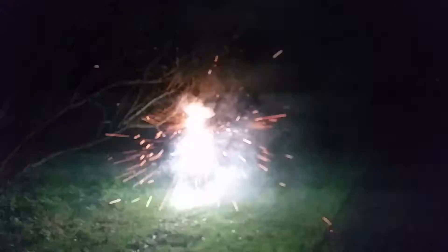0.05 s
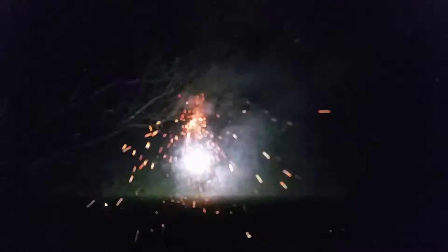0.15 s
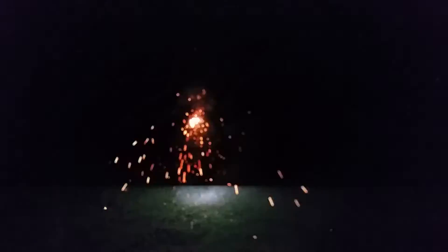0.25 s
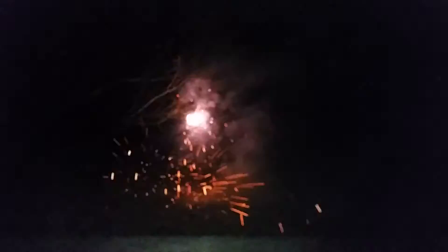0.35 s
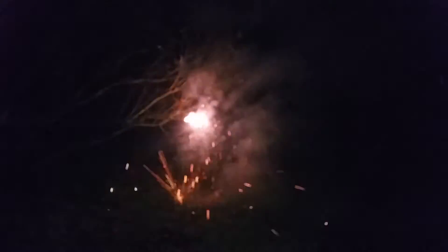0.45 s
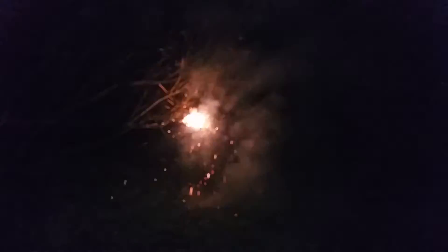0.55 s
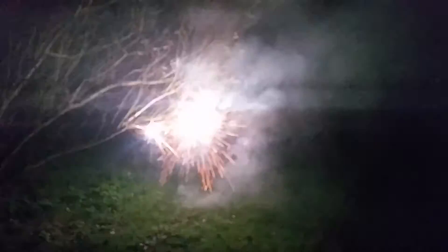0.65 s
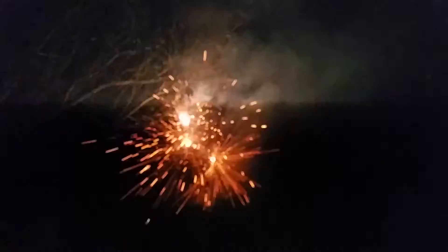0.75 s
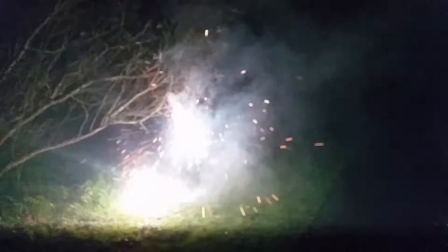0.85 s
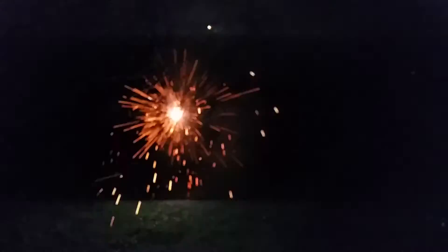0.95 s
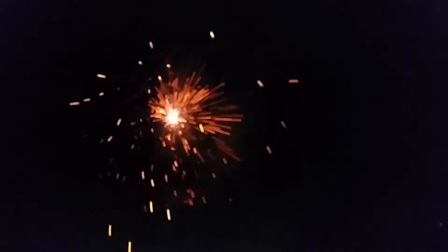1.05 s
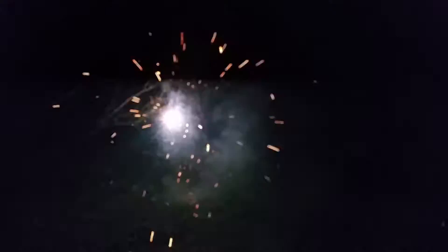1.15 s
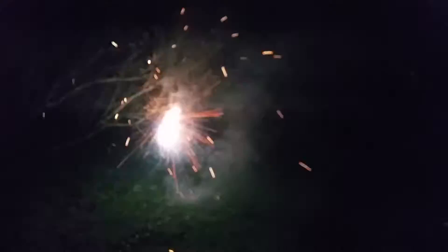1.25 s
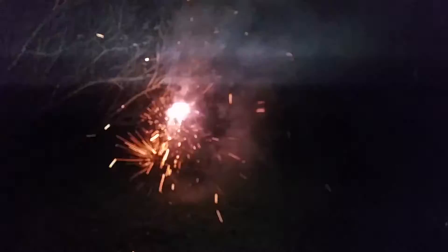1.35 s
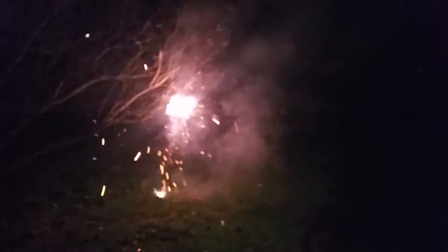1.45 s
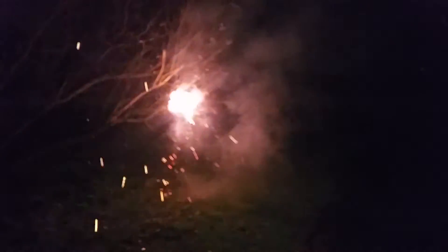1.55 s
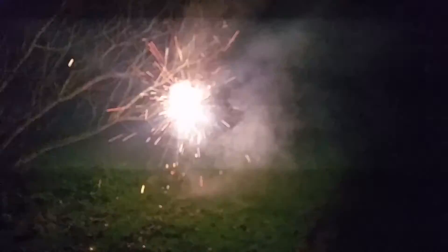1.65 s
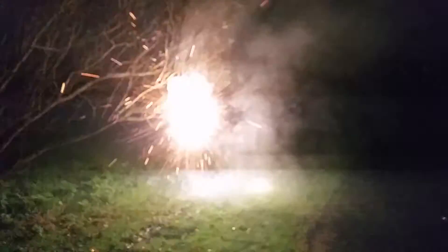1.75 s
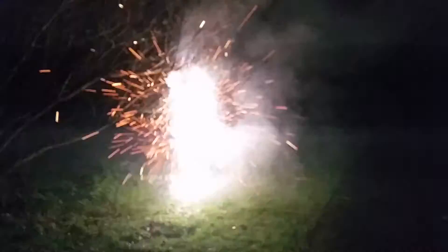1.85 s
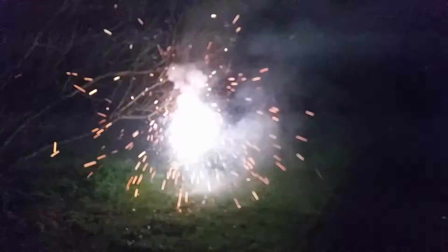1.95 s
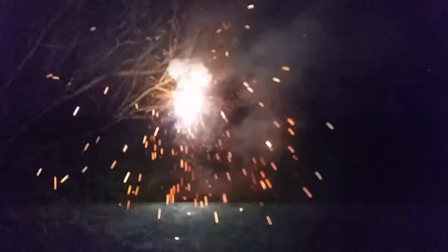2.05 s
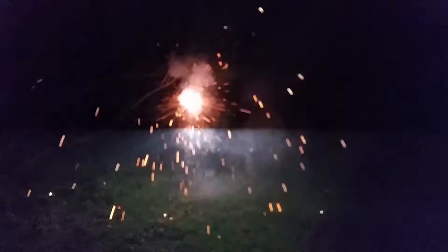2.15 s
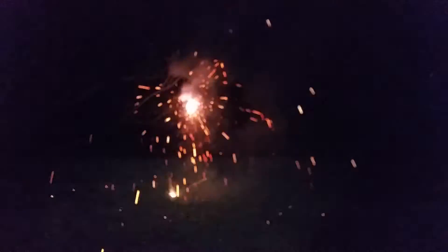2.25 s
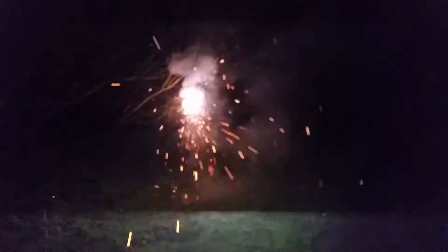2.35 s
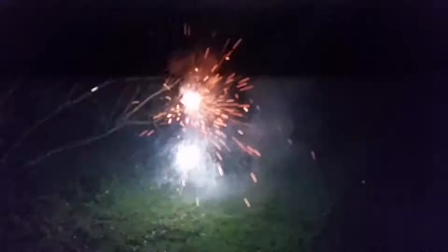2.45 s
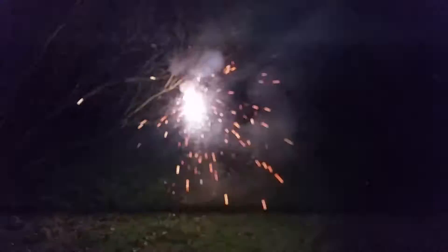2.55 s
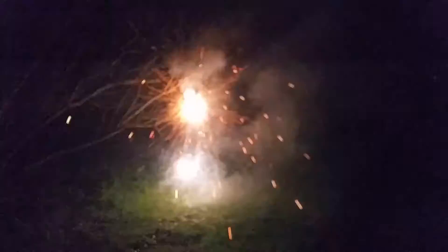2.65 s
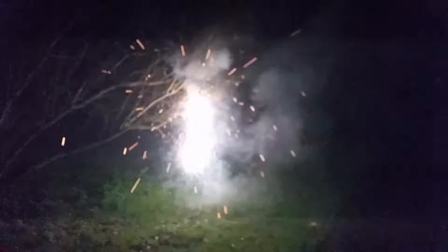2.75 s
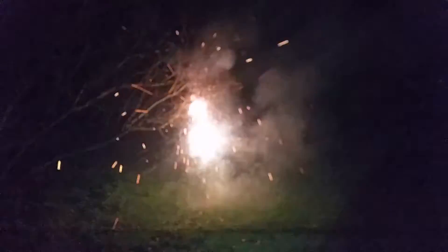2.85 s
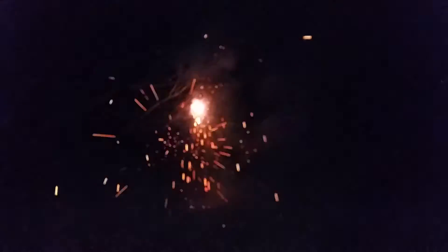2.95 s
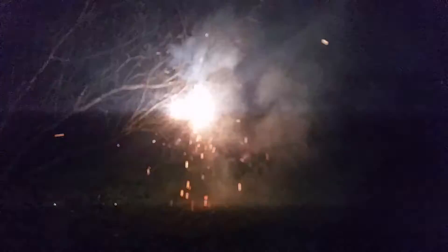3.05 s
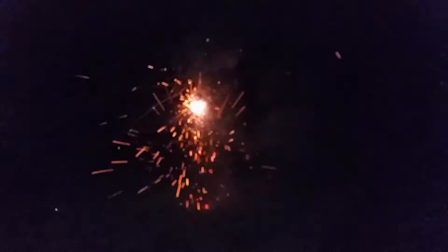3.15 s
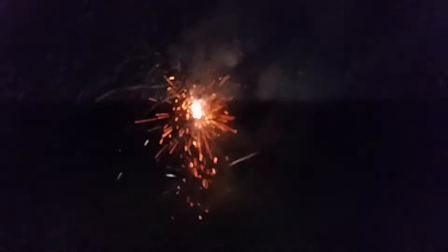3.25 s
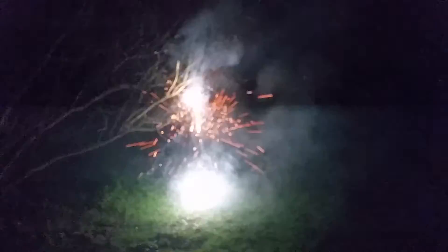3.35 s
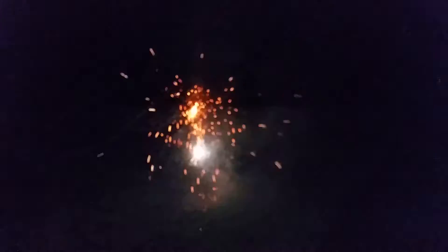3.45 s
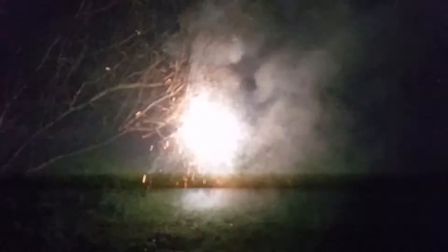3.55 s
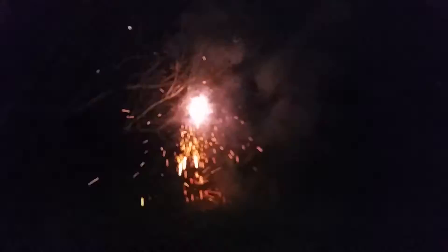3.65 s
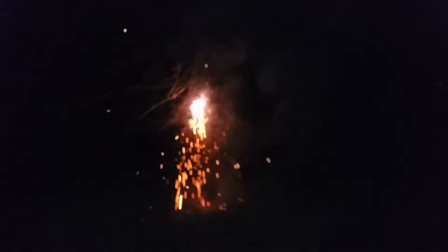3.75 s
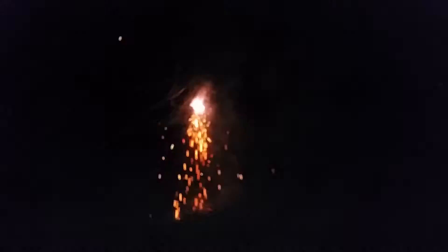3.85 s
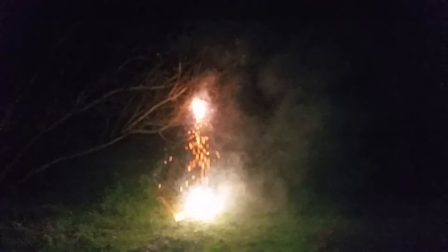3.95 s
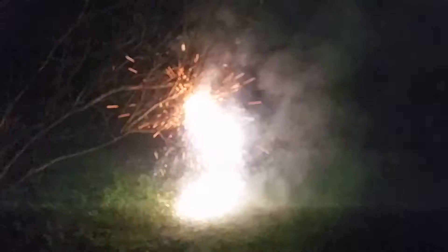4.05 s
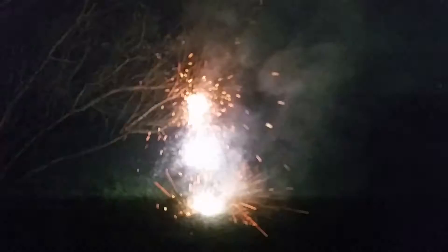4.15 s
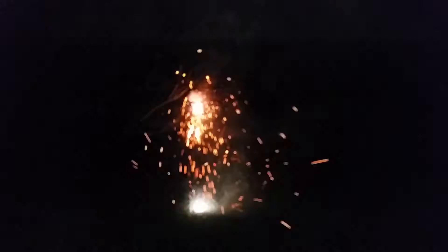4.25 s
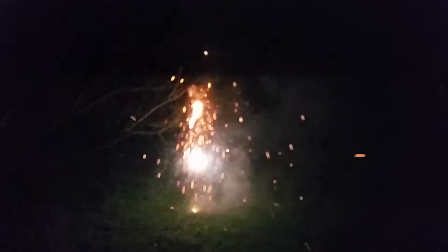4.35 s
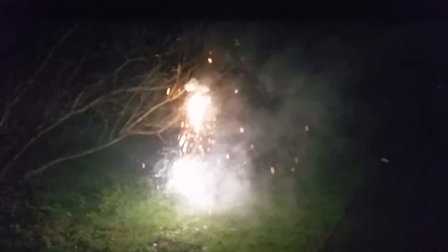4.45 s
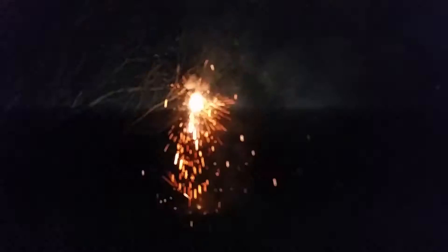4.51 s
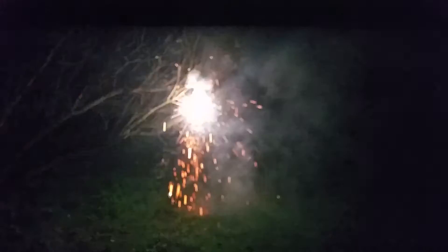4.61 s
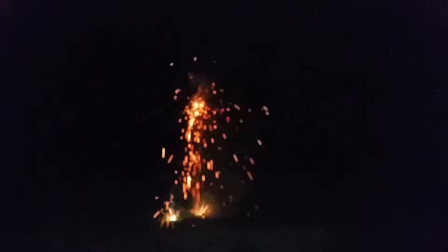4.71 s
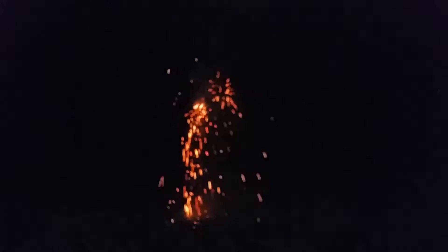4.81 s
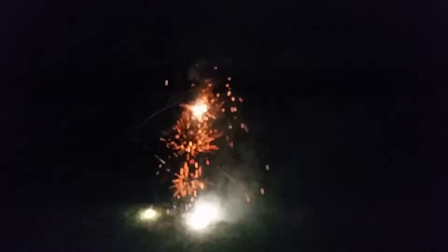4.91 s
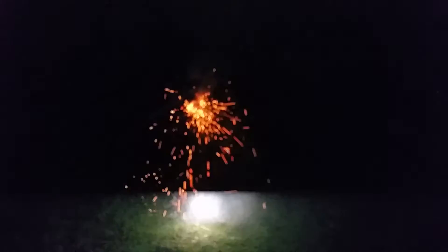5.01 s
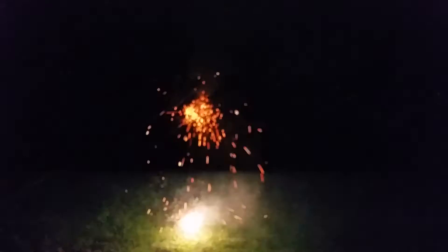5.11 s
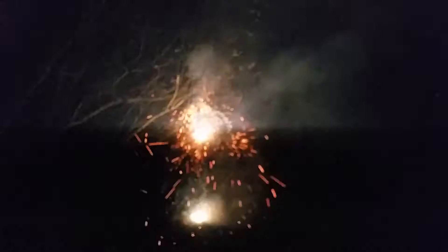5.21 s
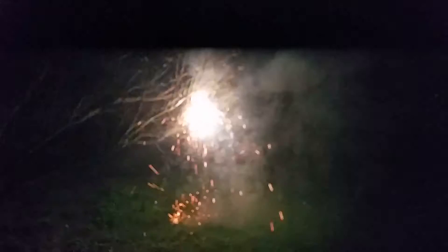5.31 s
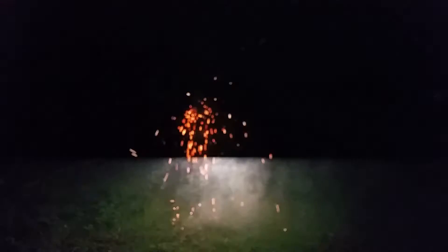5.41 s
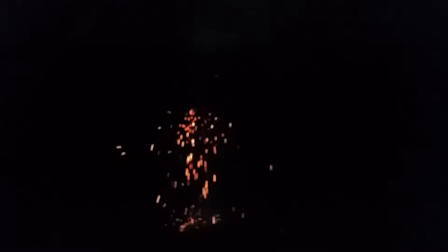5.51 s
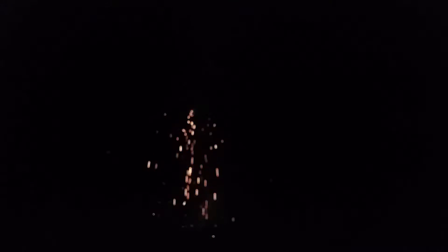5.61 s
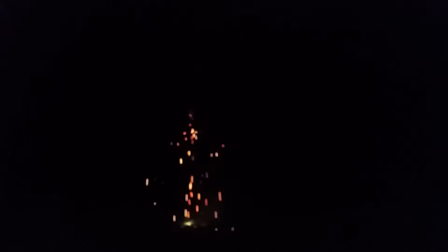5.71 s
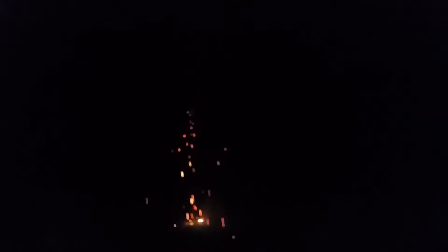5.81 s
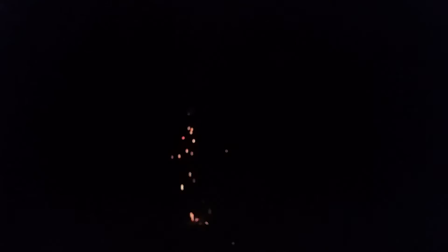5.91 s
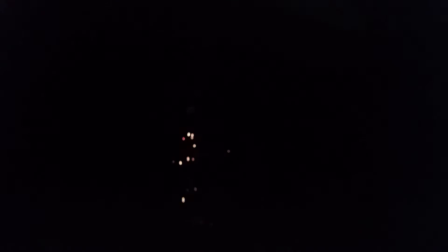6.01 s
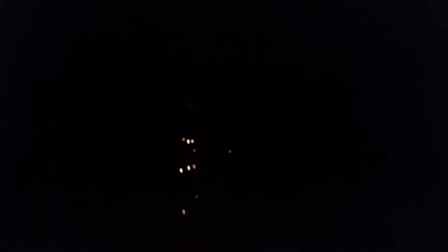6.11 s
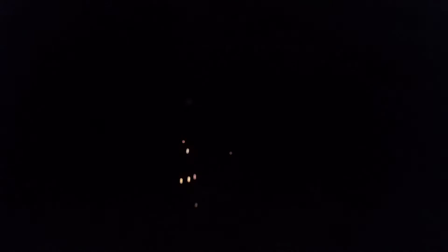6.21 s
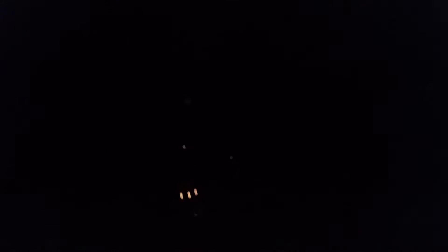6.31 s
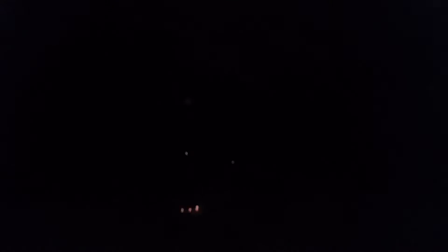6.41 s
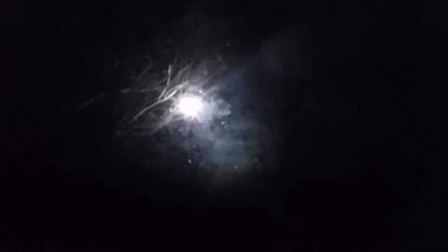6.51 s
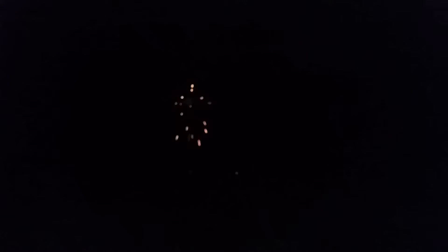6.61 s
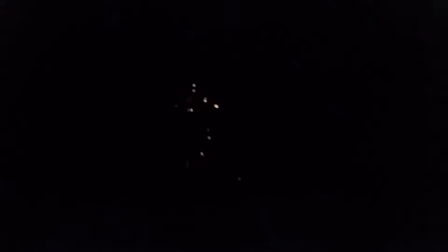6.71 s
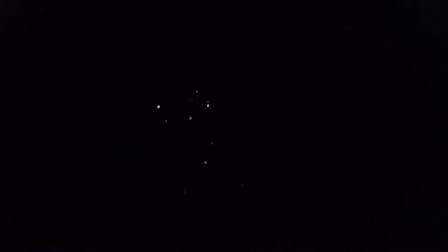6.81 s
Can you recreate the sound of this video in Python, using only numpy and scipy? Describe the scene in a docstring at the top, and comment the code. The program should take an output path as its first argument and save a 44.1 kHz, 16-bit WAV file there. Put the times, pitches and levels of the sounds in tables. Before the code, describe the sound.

Outdoors at night, a string of small firecrackers is already going off a few metres away. Sharp, dry cracks come in fast uneven clusters, with bright metallic ring, rasp and dull overload thumps. Bushes and distant walls answer with hiss and a short tail. The densest, loudest burst comes near two seconds; the bangs thin out and stop before six, leaving very quiet air and low rumble.

```python
"""A string of small firecrackers goes off over a lawn at night, some metres from two microphone ports.
Each bang is a shock pulse with port ringing and rasp, then a ground echo and returns off hard surfaces.
Bushes and far walls answer in shaped noise; overloaded capsules add low damped thumps.
A low rumble and faint night air lie underneath; after the last pop an airy rustle sets in and the rumble swells."""
import sys
import numpy as np
from scipy import signal
from scipy.fft import rfft, irfft, next_fast_len
from scipy.io import wavfile
from scipy.ndimage import uniform_filter1d, map_coordinates

SR = 44100
rng = np.random.default_rng(int(sys.argv[2]) if len(sys.argv) > 2 else 0)


def wrap_up_sound(samples):
    """Save the sound to the file named by the first command line argument, as 16-bit audio."""
    columns = np.atleast_2d(samples).T
    # keep every value between -1 and 1, then stretch to whole-number steps
    tamed = np.clip(columns, -1, 1)
    steps = np.round(tamed * 32767).astype(np.int16)
    wavfile.write(sys.argv[1], SR, steps)


N = 302946


def amp(db):
    """Decibels to amplitude gain."""
    return 10 ** (np.asarray(db) / 20)


def unit(x):
    """Scale x to rms 1."""
    return x / np.sqrt(np.mean(x ** 2) + 1e-20)


def along(points, hz):
    """Interpolate (hz, value) points on a log frequency axis."""
    point_hz, value = np.transpose(points)
    return np.interp(np.log(hz + 1), np.log(point_hz + 1), value)


def filtered(x, response):
    """Multiply the spectrum of x by response(hz), zero-padded."""
    size = next_fast_len(x.shape[-1] + 8192)
    spectrum = rfft(x, size) * response(np.fft.rfftfreq(size, 1 / SR))
    return irfft(spectrum, size)[..., :x.shape[-1]]


# Spectral difference of the ports: hz, left_over_right_db
PORT_LEAN = [(300, -1.5), (2400, 0.5), (4400, -10.5), (8100, 3.5), (15000, 0.7)]


def hiss(spectrum, size):
    """Shaped noise of rms 1, independent in the two ports and leaning as they do."""
    def response(hz):
        lean_db = np.outer([.5, -.5], along(PORT_LEAN, hz))
        return amp(along(spectrum, hz) + lean_db)
    return unit(filtered(rng.standard_normal((2, size)), response))


def clumped(x, depth_db=2.5):
    """Random gain patches over time and frequency, shared by both ports."""
    z = signal.stft(x, nperseg=256)[2]
    field = rng.standard_normal(z.shape[1:])
    field = uniform_filter1d(uniform_filter1d(field, 5, 0), 5, 1)
    patchy = z * amp(depth_db * unit(field))
    return unit(signal.istft(patchy, nperseg=256)[1][:, :N])


def wander(step):
    """Smooth random curve with one knot every step samples."""
    return map_coordinates(rng.standard_normal(N // step + 4), [np.arange(N) / step])


def strikes(times_s, sizes):
    """One impulse per event."""
    return np.bincount(np.round(times_s * SR).astype(int), sizes, N)[:N]


def shock(t, tau_s, rise_s):
    """Blast pressure: a steep jump, then suction below rest."""
    u = np.maximum(t, 0) / tau_s
    jump = 1 - np.exp(-np.maximum(t, 0) / rise_s)
    return (1 - u) * np.exp(-u * u / 2.455) * jump


# Resonances, one list per port: mode_hz, level_db, t60_s (before detuning and ring gain)
PORT_MODES = [
    [(8600, -0.1, .0028), (12200, -16, 0.0013)],
    [(5200, -6, 0.0019), (8840, 4, 0.0016)],
]


def cavity(t, detune):
    """Air in each microphone port rings in decaying modes when a shock front passes."""
    ring = []
    for modes in PORT_MODES:
        ring.append(sum(amp(db - 60 * t / t60_s) * np.sin(2 * np.pi * hz * detune * t)
                        for hz, db, t60_s in modes))
    return np.array(ring) * (1 - np.exp(-t / .0001))


# Firecracker bangs: start_s, charge_db, height_m, jolt_left, jolt_right (jolts signed, relative)
BANGS = [(0.001, -27.5, 0.9, 0.095, 0.12), (0.0086, -25.5, 1.2, -0.42, -0.43),
         (0.0272, -24.5, 1.5, -0.091, -0.13), (0.0359, -25.5, 1.5, 0.24, 0.71),
         (0.1105, -22.0, 1.7, 0.3, -0.22), (0.116, -24, 1.2, -0.19, -0.025), (0.1327, -27.0, 0.7, 0.0, 0.0),
         (0.144, -29.0, 2.0, -0.23, -0.19), (0.1703, -27.5, 1.0, -0.097, -0.068),
         (0.1733, -32, 2.2, 0.1, -0.038), (0.1769, -26.5, 1.6, -0.8, -0.1),
         (0.1825, -21.5, 1.1, 0.42, 0.28), (0.253, -25, 0.8, -0.22, -0.28), (0.3162, -24, 1.4, 0.32, 0.27),
         (0.3822, -29, 0.9, -0.095, 0.011), (0.4051, -32.5, 1.2, -0.34, -0.29),
         (0.4122, -25.5, 2.3, 0.32, 0.18), (0.4148, -18.5, 2.8, -0.026, -0.45),
         (0.4892, -28.5, 1.1, 0.27, 0.12), (0.548, -26.5, 0.7, -0.06, 0.0),
         (0.6133, -32.5, 1.8, 0.19, -0.61), (0.7076, -25, 0.8, 0.47, 0.52),
         (0.7349, -30.5, 1.7, -0.46, -0.14), (0.742, -26.5, 1.6, 0.29, -0.12), (0.7544, -35, 1.7, 0.0, 0.0),
         (0.7591, -30.5, 1.4, 0.0, 0.0), (0.7688, -26.5, 1.9, 0.12, 0.28), (0.7863, -29.5, 1.1, 0.0, 0.0),
         (0.8115, -27, 1.0, 0.077, -0.49), (0.8249, -26.5, 1.6, -0.33, 0.44),
         (0.8414, -27, 1.2, 0.29, 0.52), (0.8522, -27, 1.1, 0.0, 0.0), (0.893, -24, 1.1, 0.07, -0.06),
         (0.8996, -24.5, 2.7, -0.069, -0.15), (0.9115, -31.5, 0.9, -0.12, -0.014),
         (0.914, -24.5, 2.6, 0.32, -0.12), (0.9567, -20, 2.4, 0.1, 0.28), (1.0214, -27, 1.7, -0.43, -0.64),
         (1.0326, -26.5, 1.7, 0.0, 0.0), (1.0844, -33, 0.9, 0.0, 0.0), (1.12, -23.5, 1.6, 0.22, -0.04),
         (1.1365, -30, 1.0, -0.33, 0.072), (1.2072, -26.0, 2.2, 0.28, 0.45),
         (1.2249, -20, 0.7, -0.089, -0.4), (1.2687, -28.5, 1.6, -0.095, -0.051),
         (1.3418, -27.5, 1.7, 0.25, -0.25), (1.3617, -27, 1.1, -0.099, 0.0), (1.3984, -27, 1.5, 0.11, 0.21),
         (1.4353, -22, 1.2, 0.28, 0.36), (1.5777, -33, 1.3, 0.0, 0.0), (1.5975, -28.5, 1.5, 0.0, 0.0),
         (1.6466, -36, 2.0, 0.0, 0.0), (1.6953, -35, 2.1, -0.15, -0.5), (1.707, -36, 2.6, 0.0, 0.0),
         (1.7358, -31, 1.2, 0.0, 0.0), (1.748, -30.5, 2.0, 0.0, 0.0), (1.7576, -26, 2.2, -0.1, 0.29),
         (1.7711, -24.0, 1.7, 0.0, 0.0), (1.7973, -27.5, 1.9, 0.01, 0.0098), (1.8075, -25, 1.7, 0.29, 0.32),
         (1.8222, -24, 1.7, -0.22, -0.1), (1.825, -23.5, 2.0, 0.37, 0.44),
         (1.8321, -21.5, 1.9, 0.49, 0.047), (1.835, -17.5, 0.8, -0.15, 0.026),
         (1.8533, -18, 1.7, -0.11, 0.11), (1.8618, -23, 1.8, 0.0, 0.0), (1.88, -20.5, 1.8, 0.11, 0.51),
         (1.892, -24.5, 1.9, -0.51, -0.83), (1.899, -18.5, 0.9, 0.3, 0.76), (1.9074, -19, 0.8, 0.0, -0.51),
         (1.911, -20, 2.3, 0.26, 0.44), (1.914, -23, 1.6, 0.028, 0.17), (1.9263, -22.5, 1.7, 0.35, 0.0),
         (1.9314, -22.5, 2.9, -0.37, -0.76), (1.9469, -21, 1.8, -0.13, -0.08),
         (1.9532, -27.5, 1.4, -0.36, 0.0), (1.9708, -20.5, 2.8, 0.21, 0.43),
         (1.9857, -27.5, 1.1, -0.11, -0.19), (1.995, -25, 1.3, -0.07, -0.34), (2.0001, -29, 0.7, 0.1, 0.49),
         (2.0105, -24.5, 2.1, 0.16, -0.6), (2.03, -27.5, 2.5, -0.54, -0.054),
         (2.0344, -26.5, 0.7, -0.26, 0.25), (2.045, -29.5, 1.8, 0.0, 0.0),
         (2.051, -31.5, 1.2, -0.04, -0.25), (2.0634, -30.5, 2.3, -0.11, -0.36),
         (2.0733, -28.5, 1.6, 0.0, 0.0), (2.0999, -30.5, 0.9, 0.0, 0.0), (2.1287, -30.5, 0.7, 0.0, 0.0),
         (2.1362, -29.5, 2.0, 0.0, 0.0), (2.1541, -27.0, 1.8, 0.0, 0.0), (2.1846, -26.5, 1.0, 0.15, 0.4),
         (2.1934, -21, 1.4, 0.22, 0.2), (2.2177, -27, 1.8, 0.34, 0.4), (2.2249, -22, 2.0, -0.4, -0.5),
         (2.2743, -21.5, 1.9, 0.071, 0.037), (2.2878, -20.5, 1.0, 0.23, 0.043),
         (2.3028, -21.5, 0.7, -0.045, -0.073), (2.3564, -30.5, 1.1, 0.019, 0.0),
         (2.3777, -24.5, 2.0, -0.19, -0.08), (2.4161, -28, 1.8, 0.0, 0.0), (2.4602, -32.5, 2.0, 0.0, 0.0),
         (2.4746, -23.5, 1.9, 0.0, 0.0), (2.4867, -23, 1.2, 0.17, 0.25), (2.497, -26, 1.6, -0.18, -0.37),
         (2.5083, -24.0, 2.2, 0.0, 0.0), (2.5287, -27.5, 2.0, 0.0, 0.0), (2.5667, -20.5, 1.0, 0.46, 0.46),
         (2.5986, -29.5, 1.1, -0.15, -0.051), (2.6323, -25.0, 1.2, 0.17, -0.19),
         (2.6531, -28.0, 2.0, -0.051, -0.051), (2.6727, -27.0, 2.0, -0.13, 0.09),
         (2.6847, -20.5, 1.8, 0.36, 0.51), (2.7414, -26.5, 2.2, 0.0, 0.0), (2.7463, -28.0, 1.9, -0.2, -0.3),
         (2.7662, -23.5, 0.8, 0.0, 0.6), (2.8012, -20.5, 2.1, 0.11, 0.36), (2.8135, -24.5, 2.1, 0.0, 0.0),
         (2.818, -27.5, 1.5, 0.14, -0.41), (2.848, -29.5, 2.0, -0.3, -0.26), (2.8573, -26, 1.7, 0.092, 0.0),
         (2.8628, -26, 0.9, 0.2, -0.13), (2.8859, -24.5, 1.8, 0.0, 0.0), (2.9115, -25.5, 1.2, 0.2, -0.16),
         (2.9566, -23, 1.2, -0.022, 0.28), (2.9876, -23.5, 1.3, -0.2, -0.42),
         (3.001, -23.5, 2.7, 0.23, 0.46), (3.1426, -24.5, 1.9, 0.057, -0.34),
         (3.1533, -29, 2.1, 0.13, 0.72), (3.1912, -22.5, 0.7, -0.23, -0.59),
         (3.2072, -25.5, 1.0, 0.34, -0.026), (3.3127, -30.5, 1.9, 0.0, 0.0),
         (3.341, -25.5, 0.8, -0.033, 0.48), (3.3729, -29.5, 2.1, -0.18, -0.43),
         (3.4047, -30, 1.4, 0.0, 0.0), (3.4498, -23, 2.4, -0.12, -0.42), (3.4714, -24.5, 1.1, 0.46, 0.33),
         (3.5711, -30, 1.0, 0.0, 0.0), (3.593, -29.5, 1.3, -0.14, 0.0), (3.6125, -29.5, 1.7, -0.12, -0.1),
         (3.6502, -30, 1.6, -0.12, -0.17), (3.682, -29.5, 0.9, 0.0, 0.0), (3.7258, -28.5, 0.7, 0.0, 0.0),
         (3.911, -23.5, 2.2, 0.22, 0.24), (4.0606, -32, 1.4, 0.35, -0.14), (4.0666, -30, 1.7, -0.35, 0.022),
         (4.082, -24, 2.2, 0.0, 0.0), (4.0933, -28.5, 1.0, 0.29, 0.4), (4.1003, -32, 0.7, -0.2, -0.4),
         (4.1072, -26.5, 1.9, -0.37, -0.061), (4.1329, -30, 2.0, 0.0, 0.0),
         (4.1551, -22.5, 1.1, 0.26, 0.23), (4.1724, -34.5, 2.5, 0.038, -0.032),
         (4.177, -26.5, 0.7, 0.18, 0.15), (4.223, -30, 1.1, -0.13, 0.24),
         (4.2332, -31.5, 0.8, -0.0015, 0.087), (4.2387, -26.5, 1.0, 0.0, -0.26),
         (4.2458, -28.5, 0.7, 0.0, 0.0), (4.2526, -27, 1.0, 0.27, 0.48), (4.2666, -28, 0.9, 0.0, 0.0),
         (4.3094, -25.0, 0.9, -0.35, -0.49), (4.3198, -34, 1.6, 0.0, 0.0), (4.3327, -27.5, 1.2, 0.29, 0.18),
         (4.3709, -26.5, 1.1, -0.087, -0.042), (4.467, -28.5, 1.0, -0.039, -0.35),
         (4.4821, -29.5, 0.9, 0.0, 0.0), (4.5597, -26.5, 1.95, 0.16, 0.52),
         (4.5642, -31.5, 1.7, 0.0, -0.08), (4.6091, -28, 1.25, 0.024, -0.35), (4.6349, -35, 0.9, 0.0, 0.0),
         (4.6794, -27.0, 0.7, 0.0, 0.0), (4.7267, -27.5, 1.0, 0.0, 0.0), (4.7653, -27.5, 0.9, 0.0, 0.0),
         (4.771, -34.5, 1.6, 0.0031, 0.0), (4.826, -42, 1.1, 0.0, 0.0), (4.8429, -31.5, 0.7, 0.0, 0.0),
         (4.8955, -26.0, 0.9, 0.0, 0.0), (4.9328, -31, 2.2, 0.0, 0.0), (4.9758, -26.5, 0.9, 0.0, 0.0),
         (4.9843, -26, 1.6, 0.17, 0.039), (5.0017, -25.5, 1.2, -0.04, 0.0), (5.0227, -35, 2.2, 0.0, 0.0),
         (5.0277, -32, 2.2, 0.0, 0.0), (5.036, -31, 0.9, 0.0, 0.0), (5.0653, -25.5, 2.3, -0.11, -0.08),
         (5.088, -27.0, 2.3, 0.0, 0.0), (5.1477, -31, 0.7, 0.0, 0.0), (5.176, -31.5, 2.1, 0.0, 0.0),
         (5.2449, -20.5, 1.5, 0.21, 0.27), (5.2545, -25.0, 1.7, -0.19, -0.2),
         (5.2617, -38.5, 1.7, 0.0, 0.0), (5.2983, -31, 0.7, -0.13, -0.017),
         (5.3098, -22.0, 2.0, 0.38, 0.43), (5.3442, -32, 0.7, 0.0, 0.0), (5.3813, -33.5, 2.1, 0.0, 0.0),
         (5.4304, -22.5, 2.1, -0.039, 0.26), (5.5437, -19.5, 1.9, 0.063, 0.28),
         (5.5993, -32, 0.9, -0.015, -0.14), (5.6579, -31.0, 0.7, 0.0, 0.0), (5.6647, -35, 0.9, 0.0, 0.0),
         (5.8516, -45.5, 0.9, 0.0, 0.0), (6.6125, -60.5, 1.7, 0.0, 0.0), (6.619, -66, 2.6, 0.0, 0.0)]
# Overload rasp spectrum: hz, gain_db
RASP_SPECTRUM = [(500, 1.5), (2000, -9), (3200, -27.5), (6500, -21.5), (8600, 6.5), (11000, -17.5),
                 (14300, -6), (16000, -5.5)]
# Ground echo, before scatter: height_m, echo_db
GROUND_ECHO = [(.7, -5), (1.7, 5), (2.9, 0)]
# Shock peak over charge, before scatter and fold loss: height_m, crack_db
CRACK_LEVEL = [(.7, 20), (1.4, 20), (2.1, 21), (2.9, 16.5)]
MIC_HEIGHT_M, DISTANCE_M, SOUND_M_S = 1.5, 7.5, 343
GROUND_SPREAD_DB, CRACK_SPREAD_DB, FRONT_SPREAD_DB = 2.5, 2, 1.1
FRONT_DB, FRONT_TOP_DB = 23, -6.5  # ringing over the charge; its ceiling before scatter
CLEAN_DB, FOLD_LOSS_DB = 2.5, 2  # sharper front without overload; peak lost at full overload
ECHO_RING = .4  # ringing stirred again by the ground echo


def blasts():
    """Direct shock, port ringing and duller ground echo; overload folds the front over and adds rasp."""
    out = np.zeros((2, N + SR))
    t = np.arange(SR // 50) / SR
    noise = hiss(RASP_SPECTRUM, N + SR)
    chance = rng.standard_normal((len(BANGS), 5))
    for (start_s, charge_db, height_m, left, right), (size, tune, edge, soil, snap) in zip(BANGS, chance):
        length = np.exp(0.15 * size)
        overload = min(1, max(abs(left), abs(right)) / 0.18)

        echo_db = np.interp(height_m, *np.transpose(GROUND_ECHO)) + GROUND_SPREAD_DB * soil
        late = t - 2 * height_m * MIC_HEIGHT_M / DISTANCE_M / SOUND_M_S
        front = (1 - 2 * overload) * shock(t, 0.00018 * length, .00003)
        ground = amp(echo_db) * shock(late, 0.00015 * length, .00008)
        crack_db = charge_db + np.interp(height_m, *np.transpose(CRACK_LEVEL))
        crack_db = crack_db + CRACK_SPREAD_DB * snap - FOLD_LOSS_DB * overload
        crack = amp(crack_db + np.array([[-1.5], [1.5]])) * (front + ground)

        front_db = min(charge_db + FRONT_DB + CLEAN_DB * (1 - overload), FRONT_TOP_DB)
        front_db = front_db + FRONT_SPREAD_DB * edge
        i = round(start_s * SR)
        burst = np.exp(-(t / 0.00085) ** 2.3) + 0.45 * (late > 0) * np.exp(-np.abs(late) / 0.0029)
        rasp = (0.21 + 0.33 * overload) * burst * noise[:, i:i + len(t)]
        ring = (1.6 - .3 * overload) * cavity(t, 1 + 0.011 * tune)
        ring = ring + ECHO_RING * amp(echo_db) * cavity(np.maximum(late, 0), 0.97)
        out[:, i:i + len(t)] += crack + amp(front_db) * (ring + rasp)
    return np.array([out[0, 2:N + 2], out[1, :N]])  # left port is a little nearer


def jolts():
    """An overloaded capsule is thrown off rest either way and swings back, heavily damped."""
    rows = np.array(BANGS)
    t = np.arange(SR // 20) / SR
    swing_hz, delay_s = 100, .0003
    swing = 1.093 * np.cos(2 * np.pi * swing_hz * t) * np.exp(-t / 0.0031)
    swing = (swing + 0.56 * np.exp(-t / 0.0011)) * (1 - np.exp(-t / 0.00031))
    kicks = np.array([strikes(rows[:, 0] + delay_s, rows[:, column]) for column in (3, 4)])
    return signal.fftconvolve(kicks, swing[None], axes=1)[:, :N]


def dying(t60_s, delay_s):
    """Amplitude of the decaying energy that all bangs leave in one echo field."""
    rows = np.array(BANGS)
    energy = strikes(rows[:, 0] + delay_s, amp(2 * rows[:, 1]))
    return np.sqrt(signal.lfilter([1], [1, -amp(-120 / (t60_s * SR))], energy))


# Near branch slaps: hz, gain_db
TWIG_SPECTRUM = [(400, -30), (800, -8.5), (2500, 0), (3300, -9), (8500, -2.25), (12000, -1), (14600, -2),
                 (15500, -25)]
# Hedge scatter through the ports: hz, gain_db
HEDGE_SPECTRUM = [(180, -54), (300, -10), (517, -19), (620, -14.5), (720, -9.5), (922, -12.5), (2170, -1),
                  (3180, -9.5), (8700, 2.5), (14000, -1), (14800, -14.5), (15500, -56.5)]
# Far wall tail: hz, gain_db
WALL_SPECTRUM = [(500, -25), (1100, 4), (2200, -0.3), (3200, -4.5), (8000, -11), (14500, -24), (15000, -59)]


def echoes():
    """Near branches answer in spiky slaps, the hedge in a hiss, far walls in a long dull tail."""
    slaps = unit(amp(2.1 * wander(60)))
    loud = amp(9.0) * dying(0.042, 0.00017)
    loud = loud / np.sqrt(1 + (loud / 0.13) ** 2)  # capsules squash the strongest slaps
    near = loud * slaps * clumped(hiss(TWIG_SPECTRUM, N))
    hedge = amp(-3.0) * dying(0.25, 0.0047) * clumped(hiss(HEDGE_SPECTRUM, N))
    walls = amp(-27.5) * dying(0.68, .01) * hiss(WALL_SPECTRUM, N)
    return near + hedge + walls


# Hard surfaces returning each blast: delay_s, level_db
FENCES = [(0.0133, -23), (0.0234, -34.5)]


def fence_returns(direct):
    """Hard surfaces return delayed, weaker blasts from the far side, so the ports swap."""
    out = np.zeros((2, N))
    for delay_s, level_db in FENCES:
        delayed = np.pad(direct, ((0, 0), (round(delay_s * SR), 0)))[:, :N]
        out += amp(level_db) * delayed[::-1]
    return out


# Hum-like rumble bands: hz, gain_db
RUMBLE_SPECTRUM = [(20, -24.5), (70, 1), (100, -7), (160, -0.5), (205, -2), (250, -14.5), (320, -8.5),
                   (410, -17), (520, -13), (610, -27.5), (700, -24), (850, -43), (1500, -66)]
# Rumble level before lumps and port gains, swelling at the end: time_s, level_db
RUMBLE_LEVEL = [(0, -60.5), (5.8, -62.5), (6.58, -61.5), (6.72, -51), (6.87, -48.5)]


def rumble():
    """A low uneven drone of filtered noise, nearly the same at both ports."""
    time_s, level_db = np.transpose(RUMBLE_LEVEL)
    mid, side = hiss(RUMBLE_SPECTRUM, N)
    lumps_db = 1.2 * wander(1500)
    level = amp(np.interp(np.arange(N) / SR, time_s, level_db) + lumps_db)
    return level * np.array([1.1 * mid + .12 * side, 1.46 * mid - .12 * side])


# Faint night air: hz, gain_db
NIGHT_SPECTRUM = [(470, -28), (800, 0), (1230, -6), (1930, 3.5), (2320, 3), (2760, -16.5), (15500, -15.5)]


def night_air():
    """Faint steady noise of the night air."""
    return amp(-83) * hiss(NIGHT_SPECTRUM, N)


# Airy rustle: hz, gain_db
RUSTLE_SPECTRUM = [(2500, -25), (3600, -4), (4400, 0), (5400, -10), (8000, -25)]
RUSTLE_START_S, RUSTLE_RISE_S, RUSTLE_DB = 6.62, .04, -86


def rustle():
    """Faint clumpy band noise sets in after the last pop and stays."""
    rise = np.clip((np.arange(N) / SR - RUSTLE_START_S) / RUSTLE_RISE_S, 0, 1)
    return amp(RUSTLE_DB) * rise * clumped(hiss(RUSTLE_SPECTRUM, N))


def scene():
    """Sum the blasts with their jolts and echoes, the rumble, night air and late rustle."""
    direct = blasts()
    bangs = direct + fence_returns(direct) + jolts() + echoes()
    return bangs + rumble() + night_air() + rustle()


# Converter roll-off: hz, gain_db
ROLL_OFF = [(14500, -0.11), (14900, -19), (16000, -28.5)]
TOP_HZ = 15800


def record(dry):
    """Soft saturation towards full scale, then the converter's roll-off and band limit."""
    soft = dry / (1 + np.abs(dry) ** 4) ** (1 / 4)
    return filtered(soft, lambda hz: amp(along(ROLL_OFF, hz)) * (hz < TOP_HZ))


dry = scene()
out = record(dry)
wrap_up_sound(out)
```